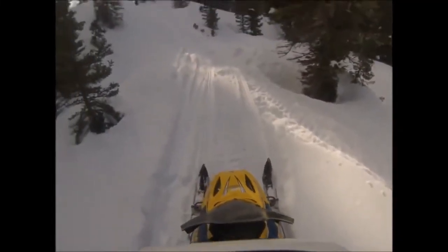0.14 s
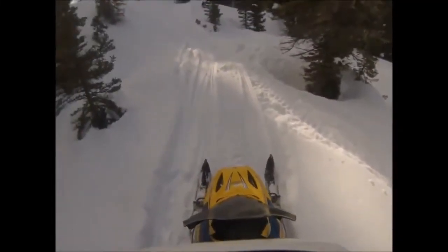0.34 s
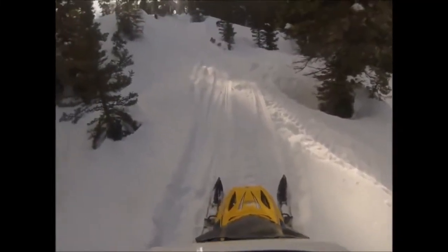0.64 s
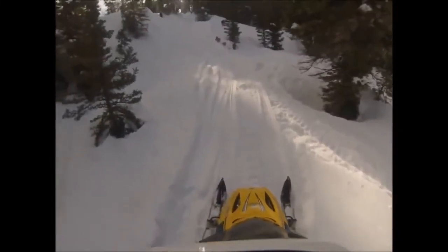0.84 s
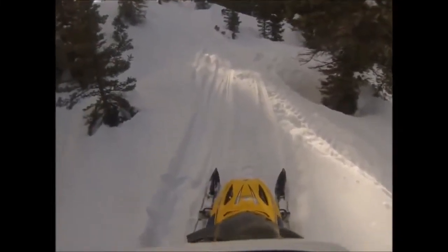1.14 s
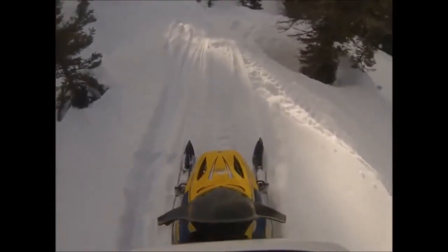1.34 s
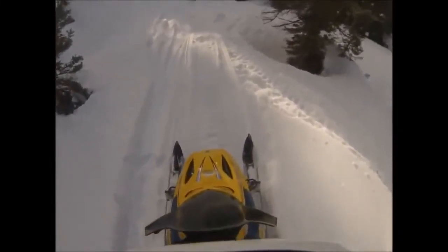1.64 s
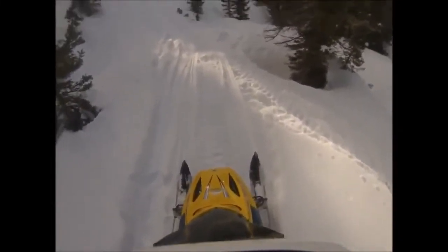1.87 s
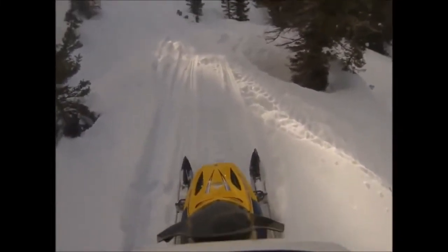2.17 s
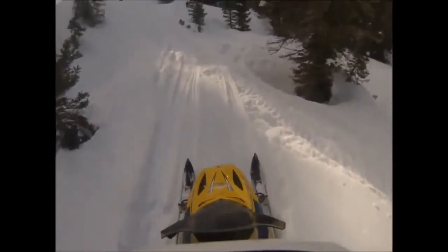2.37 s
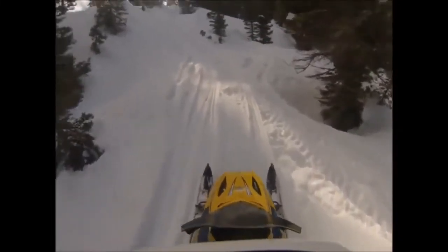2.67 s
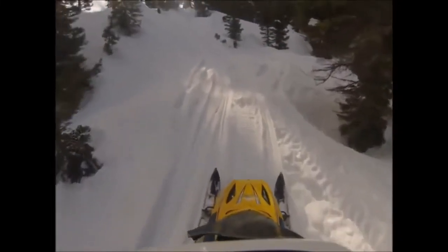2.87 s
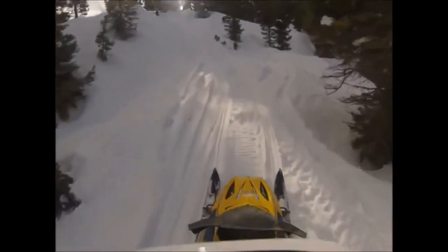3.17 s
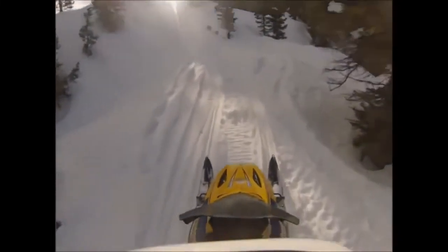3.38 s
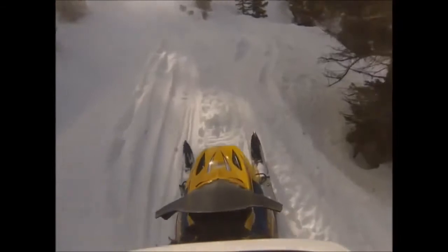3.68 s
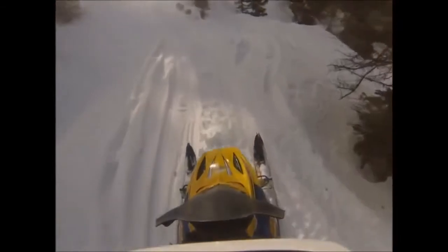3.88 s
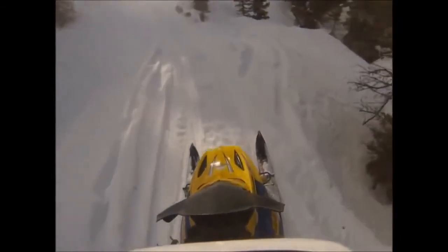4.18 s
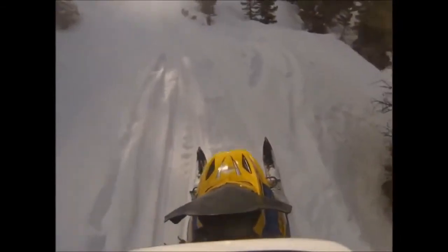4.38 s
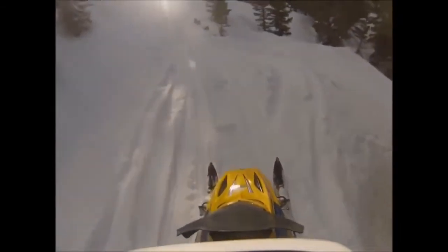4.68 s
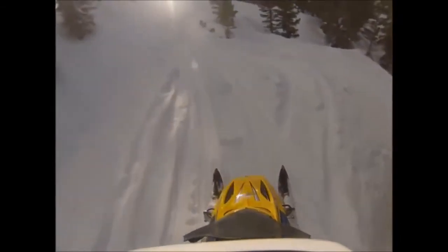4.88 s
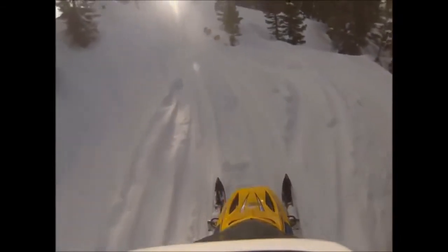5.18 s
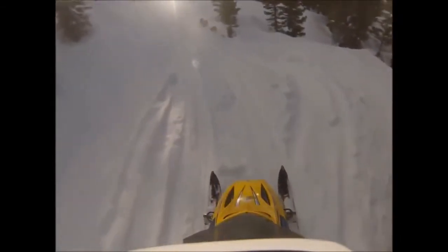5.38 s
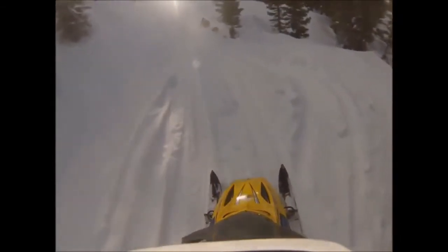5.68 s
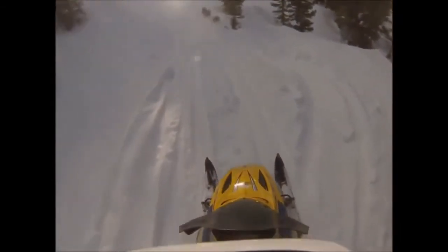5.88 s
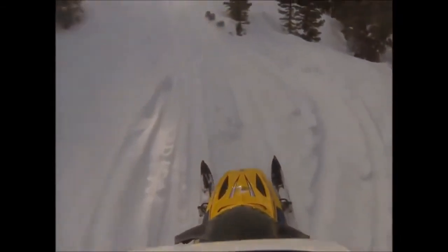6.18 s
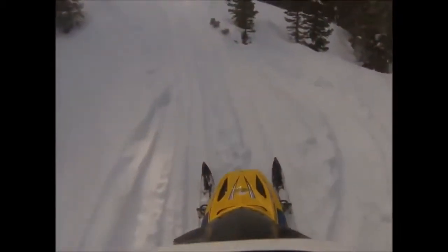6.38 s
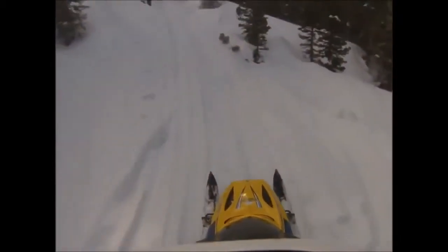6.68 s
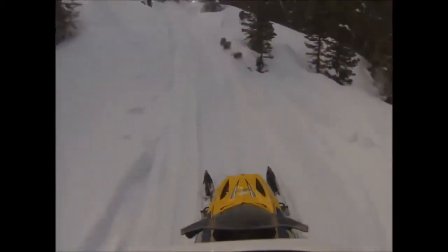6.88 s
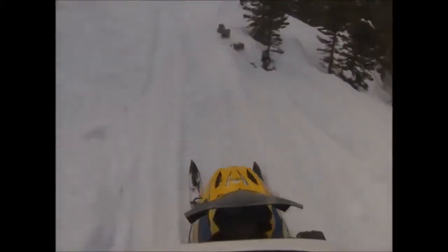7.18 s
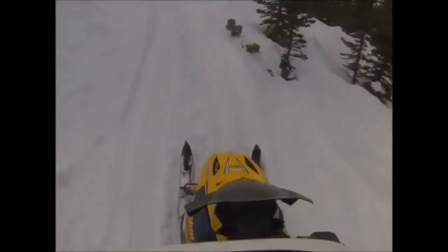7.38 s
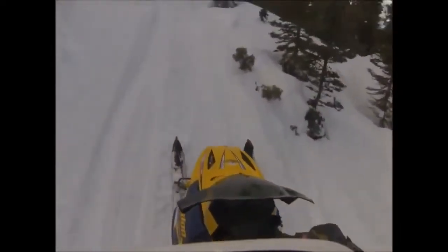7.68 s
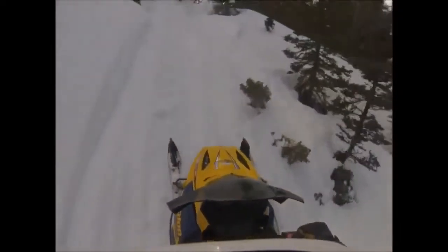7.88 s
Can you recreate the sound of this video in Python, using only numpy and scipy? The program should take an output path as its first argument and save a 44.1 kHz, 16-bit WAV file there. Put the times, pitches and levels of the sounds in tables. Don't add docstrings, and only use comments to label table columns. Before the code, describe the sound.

Helmet-mounted microphone on a snowy hillside, close to a snowmobile. Soft puttering idle first, with a hard plastic double knock, small taps and a gritty scrape. The engine then jumps up in quick throttle blips, dropping into uneven popping and gaps whenever the throttle shuts. It coasts roughly, then pulls steadily uphill, rising in pitch, with a nasal honk, raspy buzz and bursts of snowy hiss, loudest at the end.

```python
import sys
import numpy as np
from scipy import signal
from scipy.fft import rfft, irfft, next_fast_len
from scipy.io import wavfile
from scipy.ndimage import uniform_filter1d, map_coordinates

SR = 44100
rng = np.random.default_rng(int(sys.argv[2]) if len(sys.argv) > 2 else 0)


def int16_out(signal):
    q = np.round(np.clip(np.atleast_2d(signal).T, -1, 1) * 32767)
    wavfile.write(sys.argv[1], SR, q.astype(np.int16))


def makeup_ratio(level_db):
    decades = np.asarray(level_db, float) / 20
    return 10 ** decades


N = 354108

# opens in seconds, shuts in seconds, firings a second [Hz] at opening,
# firings a second [Hz] at shutting, extra pipe loudness while open in dB.
BLIPS = [
    (1.499, 1.704, 52.92, 95.5, -7.5),
    (1.758, 1.894, 100.6, 140, 2.5),
    (2.029, 2.25, 133.8, 168, 3),
    (2.348, 2.611, 148.3, 172.6, 1.5),
    (2.887, 3.161, 136.1, 158.5, 0.5),
    (3.414, 3.627, 134, 147.6, 1),
    (3.969, 4.28, 127.9, 147.5, -0.5),
]


def unit(x):
    return x / np.sqrt(np.mean(x ** 2) + 1e-20)


def ramp(x, start, span):
    return np.clip((x - start) / span, 0, 1)


def curves(rows):
    s, *cols = np.transpose(rows)
    return [np.interp(np.arange(N) / SR, s, c) for c in cols]


def wobble(rate):
    return map_coordinates(rng.standard_normal(int(N * rate / SR) + 4), [np.arange(N) * rate / SR])


def coloured(x, points, tilt_db=0, ringing=1, turn=0):
    n = x.shape[-1]
    m = 2 * next_fast_len(n // 2 + 4096)
    hz = np.fft.rfftfreq(8192, 1 / SR) + 1
    f, db = np.transpose(points)
    gain_db = np.interp(np.log(hz), np.log(f), db) + tilt_db * np.log2(hz / 1000)
    cep = irfft(np.log(makeup_ratio(gain_db) + 1e-6))
    cep[1:4096] *= 1 + ringing
    cep[4097:] *= 1 - ringing
    response = np.roll(irfft(np.exp(rfft(cep) - 1j * turn)), 2048)
    return irfft(rfft(x, m) * rfft(response, m), m)[..., 2048:n + 2048]


def levelled(x, steady, db, free=0):
    power = np.abs(uniform_filter1d(steady ** 2, size=2600)) + 1e-14
    return makeup_ratio(db) * x / np.sqrt(power ** (1 - free) * np.median(power) ** free)


def pulses(at, sizes):
    taps = np.floor(at)[:, None] + np.arange(-7, 9)
    away = taps - at[:, None]
    shape = np.sinc(away) * np.cos(np.pi * away / 18) ** 2
    places = np.clip(taps, 0, None).astype(int)
    return np.bincount(places.ravel(), (sizes[:, None] * shape).ravel(), N + SR // 10)


def shimmer(x, depth_db):
    z = signal.stft(x, nperseg=1024)[2]
    field = uniform_filter1d(rng.standard_normal(z.shape), size=4, axis=0)
    field = uniform_filter1d(field, size=7, axis=1)
    gain_db = depth_db * unit(field) - .12 * depth_db ** 2
    return signal.istft(z * makeup_ratio(gain_db), nperseg=1024)[1][:N]


def throttle():
    # time in seconds, firings a second [Hz], throttle 0-1.
    climb_rows = [
        (4.9, 130.6, 0),
        (5.61, 133.8, .1),
        (5.75, 139.6, 1),
        (6.64, 168.7, 1),
        (6.97, 178.6, .9),
        (7.29, 185.5, .68),
        (7.38, 191, .75),
        (7.48, 198, 1),
        (8.03, 201.9, 1),
    ]
    idle_hz, rise_s, sag_s, inertia_s = 54.7, .8, .27, .029
    t, (opens, shuts, low_hz, high_hz, bite_db) = np.arange(N) / SR, np.transpose(BLIPS)
    s = np.append(np.ravel([opens, shuts], "F"), climb_rows[0][0])
    hz = np.append(np.ravel([low_hz, high_hz], "F"), climb_rows[0][1])
    k = np.clip(np.searchsorted(s, t) - 1, 0, len(s) - 2)
    is_open = (k % 2 == 0) & (t > s[0])
    ease = np.where(is_open, rise_s, sag_s)
    done = np.expm1(-np.clip(t - s[k], 0, None) / ease) / np.expm1(-(s[k + 1] - s[k]) / ease)
    idle_extra_hz = (idle_hz - hz[0]) * np.clip(1 - t / s[0], 0, 1)
    blipped_hz = hz[k] + (hz[k + 1] - hz[k]) * done + idle_extra_hz
    climb_hz, climb = curves(climb_rows)
    late = t > s[-1]
    firing_hz = np.where(late, climb_hz, blipped_hz)
    opening = np.where(late, climb, is_open)
    rows = [firing_hz, opening, is_open * bite_db[k // 2], late * climb]
    return uniform_filter1d(np.array(rows), int(inertia_s * SR), axis=1)


def combustion(firing_hz, opening, climbing):
    running = ramp(firing_hz, 55, 70)
    gain_hz_per_s = uniform_filter1d(np.gradient(firing_hz) * SR, SR // 20)
    shut_db = 1 + .008 * np.clip(-gain_hz_per_s, 0, 100) + .1 * (1 - running)
    scatter_db = shut_db + (.25 - shut_db) * opening * running
    top = ramp(firing_hz, 175, 6)
    imbalance_db = .4 - .25 * running + .85 * top * np.exp(-(gain_hz_per_s / 60) ** 2)
    pull = (.35 * opening + .3 * climbing) * ramp(firing_hz, 170, -14)
    honk_clean = .2 + running * (.1 + pull + .3 * top)
    pull = .33 * opening - .08 * climbing + .2 * climbing ** 6
    pull *= ramp(firing_hz, 137 + 7 * climbing, 22 - 8 * climbing)
    pull *= 1 - .95 * climbing * ramp(firing_hz, 167, 8)
    rasp_clean = .05 + running * (.2 - .16 * top + pull)
    return scatter_db, imbalance_db, honk_clean, rasp_clean


def misfired(size_db, at):
    # start in seconds, length in seconds, level in dB.
    misfires = [(1.605, 0.005, 6), (1.701, 0.023, -1.5), (1.732, 0.014, -11.5), (1.766, 0.011, -9),
                (1.911, 0.068, -11), (1.986, 0.016, -14), (2.01, 0.013, -9), (2.261, 0.018, -4.6),
                (2.619, 0.006, -19.5), (2.638, 0.006, -26), (2.65, 0.014, -26), (2.686, 0.009, -7),
                (2.696, 0.039, -10.5), (2.766, 0.051, -9.5), (2.836, 0.046, -10), (2.91, 0.009, -7.5),
                (3.202, 0.006, -9), (3.219, 0.025, -15), (3.251, 0.005, -1.5), (3.268, 0.008, -12),
                (3.282, 0.043, -14.5), (3.333, 0.007, -10), (3.356, 0.007, -9), (3.372, 0.044, -10),
                (3.648, 0.014, -15), (3.671, 0.011, -5.5), (3.691, 0.015, -3), (3.735, 0.004, -8),
                (3.745, 0.029, -6), (3.781, 0.006, -4), (3.797, 0.013, -11), (3.82, 0.006, -5),
                (3.836, 0.016, -9), (3.858, 0.006, -7), (3.871, 0.03, -4), (3.931, 0.049, -9),
                (4.331, 0.031, -4.5), (4.394, 0.013, -5.5), (4.452, 0.012, -2), (4.53, 0.009, -6.5),
                (4.55, 0.013, -4), (4.567, 0.008, -5), (4.618, 0.006, -2.5), (4.632, 0.011, -1.5),
                (4.683, 0.012, 0), (4.701, 0.008, -6.5), (4.742, 0.006, -11), (4.764, 0.006, -1),
                (4.805, 0.005, 7), (4.818, 0.012, -8.5), (4.842, 0.006, -1.5), (4.881, 0.021, -4.5),
                (4.94, 0.007, -12), (5.025, 0.005, -3.5), (5.064, 0.005, 1.5), (5.134, 0.009, 7),
                (5.33, 0.007, -0.5), (5.459, 0.006, -3.5), (5.517, 0.005, -6), (5.579, 0.012, -1.5)]
    # start in seconds, length in seconds, level in dB.
    stutters = [
        (2.285, .006, -7),
        (2.307, .006, -7.5),
        (2.327, .006, -18),
        (2.35, .006, -11.5),
    ]
    recharge_db = [1, 3, 0.3]
    lead_s, depth = .0005, 1.53
    size_db, free, order = size_db.copy(), 0, np.arange(len(at))
    for s, length, db in sorted(list(misfires) + list(stutters)):
        start, end = np.interp(np.array([s, s + length]) * SR - lead_s * SR, at, order)
        lost = max(round(end - start), 1)
        first = max(round((start + end - lost + 1) / 2), free)
        stop = first + lost
        size_db[first:stop] = depth * min(db, 0) + 0.66 * size_db[first:stop]
        after = len(recharge_db) if lost > 2 else 1
        size_db[stop:stop + after] = np.array(recharge_db[:after]) * min(lost / 4, 1)
        free = stop + 1
    return size_db


def firings():
    # time in seconds, loudness of a full firing in dB, effort (level of the rasp) in dB.
    load = [(0, -45.5, -70.5), (1.45, -46, -73.5), (1.6, -40, -63), (1.9, -41.5, -53.5), (2.1, -40, -52.5),
            (2.3, -41.5, -50), (2.6, -41.5, -51), (2.85, -39, -53.5), (3.4, -40, -54), (3.9, -41, -54.5),
            (5.5, -42.5, -56.5), (5.86, -38.5, -54.5), (6.5, -43, -47), (6.89, -40, -51),
            (7.02, -42, -51.5), (7.16, -44.5, -51.5), (7.3, -41, -50), (7.42, -41, -50), (7.54, -35.5, -50),
            (8.03, -36.5, -47.5)]
    firing_hz, opening, bite_db, climbing = throttle()
    thump_db, rasp_db = curves(load)
    scatter_db, imbalance_db, honk_clean, rasp_clean = combustion(firing_hz, opening, climbing)
    turns = np.cumsum(firing_hz) / SR
    even = np.interp(np.arange(1, int(turns[-1])), turns, np.arange(N))
    even = np.append(even, even[-1] + SR / firing_hz[-1] * np.arange(1, 9))
    here = np.minimum(even.astype(int), N - 1)
    luck = rng.standard_normal((4000, 3))[:len(even)]
    size_db = misfired(scatter_db[here] * np.clip(luck[:, 0], -2, 1.6), even)
    cylinder_db = imbalance_db[here] * (-1) ** np.arange(len(even))
    at = even + 0.0072 * luck[:, 1] * scatter_db[here] * SR / firing_hz[here]
    return dict(
        firing_hz=firing_hz, opening=opening, bite_db=bite_db, climbing=climbing, thump_db=thump_db,
        rasp_db=rasp_db, scatter_db=scatter_db, imbalance_db=imbalance_db, honk_clean=honk_clean,
        rasp_clean=rasp_clean, turns=turns, even=even, here=here, luck=luck, size_db=size_db,
        cylinder_db=cylinder_db, at=at,
        flow=ramp(firing_hz, 60, 35),
        flat_out=ramp(firing_hz, 188, 9))


def struck(run, points, depth, uneven, db, smear=None, ringing=1, free=0, turn=0, echo=0):
    pump_db = -11.5
    at, here = run["at"], run["here"]
    size_db, cylinder_db = depth * run["size_db"], uneven * run["cylinder_db"]
    real = pulses(at, makeup_ratio(np.maximum(size_db, pump_db) + cylinder_db))
    steady = pulses(at, np.ones(len(at)))
    if echo:
        late = at + SR / run["firing_hz"][here] / 10
        share = echo * (1 - run["climbing"][here])
        real = real + pulses(late, share * makeup_ratio(size_db + cylinder_db))
        steady = steady + pulses(late, share)
    trains = np.array([real, steady])
    if smear is not None:
        trains = signal.oaconvolve(trains, smear[None], axes=1)
    real, steady = coloured(trains, points, ringing=ringing, turn=turn)[:, :N]
    return levelled(real, steady, db, free)


def gas(run, points, db, beat=1):
    gate = 1 + .15 * np.cos(2 * np.pi * run["turns"])
    gate += .5 * np.cos(np.pi * run["turns"]) * run["imbalance_db"] * beat
    noise = gate * makeup_ratio(1.4 * wobble(14)) * rng.standard_normal(N)
    return makeup_ratio(db) * unit(coloured(noise, points))


def mixed(run, struck_points, gas_points, clean, depth, uneven, db, free=0, echo=0):
    share = np.clip(clean, .01, .99)
    ring = struck(run, struck_points, depth, uneven, db, free=free, echo=echo)
    return np.sqrt(share) * ring + np.sqrt(1 - share) * gas(run, gas_points, db)


def thump(run):
    # Hz, dB.
    tickover = [(15, -56), (30, -9.5), (53, -2), (80, -45), (106, 1), (135, -17), (160, 7.5), (185, -3.5),
                (197, -25), (213, -19), (240, -32), (268, -23.5), (320, -44), (500, -58), (2000, -120)]
    # Hz, dB.
    lope = [(20, -42), (60, -23.5), (90, -2.5), (112, -1.5), (135, -7), (200, -31), (400, -60),
            (2000, -120)]
    # Hz, dB.
    muffler = [(15, -23.5), (35, -4.5), (70, -1), (140, -3.5), (200, -3), (260, -24), (330, -27.5),
               (600, -71), (2000, -120)]
    # Hz, dB.
    pickup = [(50, -11), (100, -5), (160, -1), (260, 10), (400, 6)]
    swing_rad = 1.2
    db, flow = run["thump_db"] + 3.0, run["flow"]
    out = (1 - flow) * struck(run, tickover, 3.0, 0.38, db, ringing=-0.0025, turn=swing_rad)
    out += (1 - flow) * gas(run, lope, -50.5 + 3 * wobble(4.1))
    out += flow * struck(run, muffler, 1.28, 0.81, db, ringing=0.099, turn=swing_rad)
    out += flow * ramp(run["firing_hz"], 108, -14) * (coloured(out, pickup, ringing=0) - out)
    return out


def bark(run):
    # Hz, dB.
    pipe = [(140, -18.5), (240, -5.5), (270, -5.5), (310, -13.5), (360, -7.5), (403, -3.5), (527, -9.5),
            (583, -3), (720, -25), (800, -23), (940, -47), (1580, -120)]
    # Hz, dB.
    buried = [(100, 7.5), (300, 4), (350, 0.5), (440, -4), (580, -9), (720, 3), (3000, 10)]
    # Hz, dB.
    choked = [(100, 4), (450, -1.5), (560, -4.5), (660, -0.5), (3000, -12)]
    hz, opening, climbing = run["firing_hz"], run["opening"], run["climbing"]
    db = -49.5 + run["bite_db"] - 24 * ramp(hz, 62, -8)
    db -= 4.5 * opening * ramp(hz, 100, -30)
    db += (-5 + 1 * (run["rasp_db"] + 52.0)) * climbing
    clean = .97 - 0.045 * run["scatter_db"] - 0.25 * run["flat_out"] - .3 * ramp(hz, 58, -4)
    out = shimmer(mixed(run, pipe, pipe, clean, 0.38, 4.1, db, echo=.85), 1.3)
    snow = climbing * (coloured(out, buried) - out)
    shut = (1 - opening) * run["flow"] * (coloured(out, choked) - out)
    return out + snow + shut


def honk(run):
    # Hz, dB.
    honk_points = [(420, -40), (760, -39), (805, -21.5), (840, -3), (890, 1), (960, -15), (1060, -5),
                   (1320, -23.5), (1720, -60.5), (2900, -120)]
    # Hz, dB.
    hum = [(420, -46.5), (720, -18.5), (828, -15), (1040, -14.5), (1100, -4), (1250, -14.5), (1320, -29),
           (1720, -42), (2900, -120)]
    # Hz, dB.
    wound_up = [(600, -3.5), (850, -5), (1000, -3.5), (1110, 3.5), (1300, -1.5)]
    blips_db = [2, -2, 0.5, -1, -1, 0, -4.5]
    hz, opening, climbing = run["firing_hz"], run["opening"], run["climbing"]
    db = -56.5 + 0.68 * np.minimum(run["rasp_db"] + 44.5, 0) + 2 * opening
    db += 5.5 * climbing * np.clip((163 - hz) / 9, -.3, 1)
    by_blip_db = np.interp(np.arange(N) / SR, [blip[0] for blip in BLIPS], blips_db)
    db += (opening - climbing) * by_blip_db + 1 * run["flat_out"]
    out = shimmer(mixed(run, honk_points, hum, run["honk_clean"], 0.69, 0.69, db, free=1.0), 1.6)
    return out + climbing * ramp(hz, 161, 6) * (coloured(out, wound_up) - out)


def rasp(run):
    # Hz, dB.
    ring_points = [(780, -60), (1320, -10), (1470, -4), (1600, 0.5), (1720, -12), (1860, 6.5), (2020, -11),
                   (2220, -2), (2350, -11), (2800, -21), (3100, -22), (3500, -39.5), (4200, -53.5),
                   (7000, -120)]
    # Hz, dB.
    rasp_points = [(780, -32.5), (1320, -18.5), (1460, -5), (1700, -7), (1750, -2), (1850, 4), (1950, -7),
                   (2000, -8), (2120, -16), (2530, -11), (3140, -24), (3520, -32), (4580, -71.5),
                   (7740, -120)]
    # multiple of firing rate, dB.
    peal_rows = [(8, -18), (8.5, -23), (9, 3), (9.5, 3.5), (10, -8.5), (10.5, -12.5)]
    rasp_db, clean, flat_out = run["rasp_db"], run["rasp_clean"], run["flat_out"]
    tail = np.arange(SR // 25) / SR
    cowl = rng.standard_normal(len(tail)) * makeup_ratio(-60 * tail / 0.037)
    cowl = irfft(np.exp(1j * np.angle(rfft(cowl))))
    ring = shimmer(struck(run, ring_points, 0.93, 5.7, rasp_db, cowl, free=0.71), 2.7)
    ring *= 1 - 0.8 * flat_out
    peal = np.zeros(N)
    for multiple, db in peal_rows:
        phase = 2 * np.pi * multiple * run["turns"] + 0.74 * wobble(35)
        peal += makeup_ratio(db + 1.5 * wobble(30)) * np.sin(phase)
    out = np.sqrt(clean) * ring + np.sqrt(1 - clean) * gas(run, rasp_points, rasp_db)
    return out + flat_out * makeup_ratio(-49) * peal


def hiss(run):
    # Hz, dB.
    fizz = [(2500, -40), (3450, -19.5), (3790, 0.5), (4100, -7.5), (4550, -1.5), (5200, -9), (6300, -6.5),
            (7500, -15.5), (9000, -29.5), (10500, -19), (12600, -23.5), (12900, -62)]
    # middle in seconds, width in seconds, lift in dB.
    sprays = [
        (2.17, 0.057, 1),
        (3.11, 0.066, 5),
        (4.24, 0.07, 3),
        (6.31, 0.13, 7),
        (6.65, 0.054, 3.5),
        (7.24, 0.046, 0),
    ]
    pulling = np.clip(3 * run["climbing"], 0, 1)
    climb_db = -81.5 + 0.1931 * (run["firing_hz"] - 140)
    blip_db = -82.5 + 1.3 * (run["rasp_db"] + 56.5)
    db = pulling * climb_db + (1 - pulling) * blip_db
    for s, spread_s, lift_db in sprays:
        db += lift_db * np.exp(-((np.arange(N) / SR - s) / spread_s) ** 2)
    return gas(run, fizz, db, beat=0.19)


def flare(run):
    # Hz, dB.
    flare_points = [(1200, -81.5), (2000, -0.5), (2250, 10), (2500, -8), (2800, 4), (3200, 1),
                    (3700, -20.5), (4600, -26), (6500, -34.5), (9000, -53)]
    hz, luck = run["firing_hz"], run["luck"]
    pulling = np.clip(3 * run["climbing"], 0, 1)
    peaking = 1 - pulling + pulling * 0.76 * ramp(hz, 170, -8)
    peaking *= (0.32 + 0.3 * run["opening"]) * ramp(hz, 148.5, 3.6)
    buzz = pulses(run["even"] + .3 * luck[:, 1], makeup_ratio(.3 * run["size_db"] + .9 * luck[:, 0]))
    return makeup_ratio(-59) * peaking * shimmer(unit(coloured(buzz, flare_points)[:N]), 1.5)


def engine(run):
    return thump(run) - bark(run) + honk(run) + rasp(run) + hiss(run) + flare(run)


def rumble(run):
    # Hz, dB.
    rumble_points = [(10, -45), (25, -15.5), (45, -16.5), (80, -14), (200, -16), (400, -33.5), (1500, -120)]
    hz = run["firing_hz"]
    db = -56 + 5.4 * (run["scatter_db"] - 1) + 0.0164 * np.clip(hz - 135, 0, 99)
    db += 23.5 * run["climbing"] * (1 - run["opening"]) * ramp(hz, 165, 9)
    lumps_db = 5.1 * np.tanh(wobble(17))
    return makeup_ratio(db + lumps_db) * unit(coloured(rng.standard_normal(N), rumble_points))


def electronics():
    # Hz, dB.
    floor_points = [(100, 10.5), (1000, 2), (4000, -5), (8000, -7), (12600, -8.5), (12800, -20.5),
                    (15400, -15), (15600, -63.5)]
    # Hz, peak level in dB, flicker in dB.
    whines = [(8448, -96, 2), (11294, -103, 7), (12672, -101, 2)]
    t = np.arange(N) / SR
    out = makeup_ratio(-79.0) * unit(coloured(rng.standard_normal(N), floor_points))
    for hz, db, flicker_db in whines:
        tone = np.sin(2 * np.pi * hz * t + .6 * wobble(20))
        out += makeup_ratio(db + flicker_db * np.tanh(3 * wobble(16))) * tone
    return out


def touches(rows, colour, grain_db):
    out, t = np.zeros(N), np.arange(SR // 5) / SR
    for s, db, rise_s, t60_s, tilt_db in rows:
        grains = np.repeat(rng.standard_normal(len(t) // 40 + 1), 40)[:len(t)]
        noise = makeup_ratio(grain_db * grains) * rng.standard_normal(len(t))
        burst = unit(coloured(noise, colour, tilt_db))
        out[round(s * SR):][:len(t)] += makeup_ratio(db - 60 * t / t60_s) * (1 - np.exp(-t / rise_s)) * burst
    return out


def knocks():
    # start in seconds, level in dB, rise in seconds, time to fall 60 dB in seconds,
    # brightness in dB per octave.
    knock_rows = [
        (.185, -36.5, 0.00054, 0.029, 1),
        (0.226, -46.5, 0.02, 0.31, 4.5),
        (0.258, -20.5, 0.00032, 0.029, 1.5),
        (.268, -22, 0.001, 0.024, -2),
        (0.311, -49, 0.016, 0.24, 2.5),
        (0.342, -34, 0.0069, 0.11, -12),
        (.452, -41, 0.0015, 0.052, -0.5),
        (.612, -41, 0.007, 0.16, 1),
        (.64, -44, 0.0045, 0.093, -6),
    ]
    # Hz, dB.
    shell = [(100, -55), (330, -14.5), (465, 21.5), (620, -6), (830, 8.5), (1300, -18), (1900, -3),
             (2400, -19), (3500, -26), (4400, -32), (5300, -41), (6300, -36), (8000, -47), (13000, -81)]
    return touches(knock_rows, shell, 0)


def hard_knock():
    # Hz, dB, time to fall 60 dB in seconds.
    tones = [(477, -2, 0.046), (835, -19, 0.022), (1750, 11, 0.011), (2930, -21, 0.016), (3550, -19, .012),
             (6420, -18, 0.0091)]
    # start in seconds, level in dB, Hz, time to fall 60 dB in seconds.
    thud = [
        (.2695, -19.5, 108, .065),
    ]
    out, t = np.zeros(N), np.arange(SR // 5) / SR
    ring = np.zeros(len(t))
    for hz, db, t60_s in tones:
        ring += makeup_ratio(db - 60 * t / np.clip(t60_s, .01, .06)) * np.sin(2 * np.pi * hz * t)
    out[round(.2575 * SR):][:len(t)] += makeup_ratio(-26.5) * ring * (1 - np.exp(-t / 0.00078))
    s, db, hz, t60_s = thud[0]
    push = np.sin(2 * np.pi * hz * t + .5) * (1 - np.exp(-t / .002))
    out[round(s * SR):][:len(t)] += makeup_ratio(db - 60 * t / t60_s) * push
    return out


def scrapes():
    # start in seconds, level in dB, rise in seconds, time to fall 60 dB in seconds,
    # brightness in dB per octave.
    scrape_rows = [
        (.616, -50, 0.0086, 0.061, -4),
        (.626, -45, 0.0039, 0.03, -2),
        (.638, -41.5, 0.005, 0.067, -4.5),
        (.654, -34, 0.002, 0.05, -1.5),
        (.662, -43, 0.0023, 0.027, -2.5),
    ]
    # Hz, dB.
    rubbed = [(300, -22), (470, -10), (700, -18), (1100, -2), (1500, -16), (2150, 2), (2800, -22),
              (3800, -32), (4500, -25), (5300, -36), (5900, -32), (6300, -19), (6800, -34), (7400, -55)]
    return touches(scrape_rows, rubbed, 3.5)


def scene():
    run = firings()
    return (engine(run) + rumble(run) + electronics() + knocks() + hard_knock() + scrapes())[None]


def band_limit(x):
    return signal.sosfilt(signal.butter(12, 15400, fs=SR, output="sos"), x)


def record(dry):
    return band_limit(dry)


dry = scene()
out = record(dry)
int16_out(out)
```